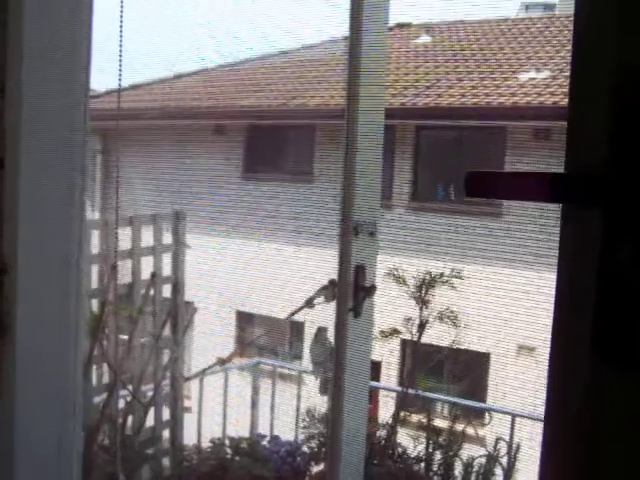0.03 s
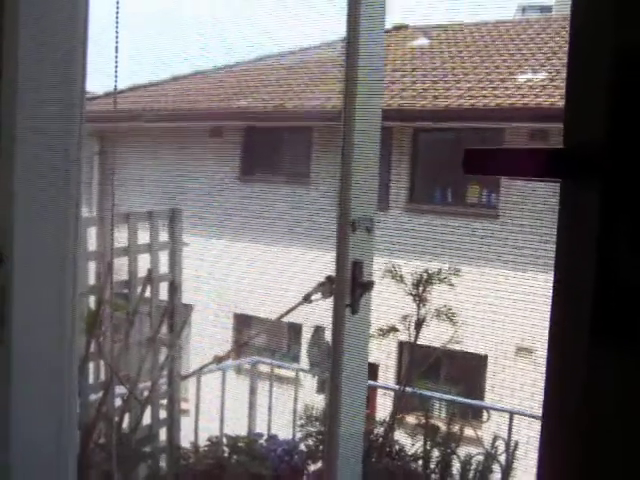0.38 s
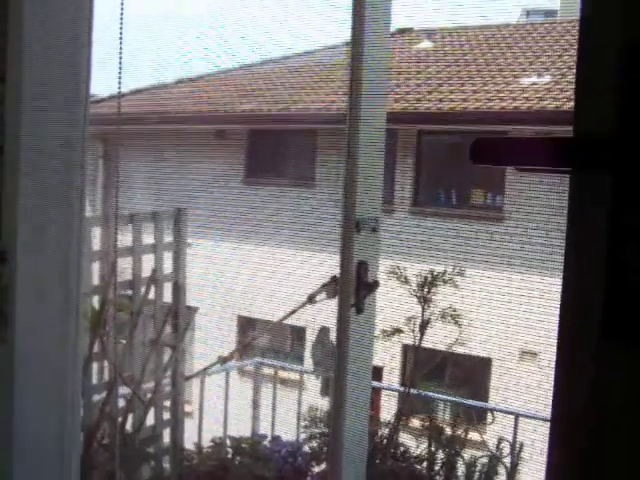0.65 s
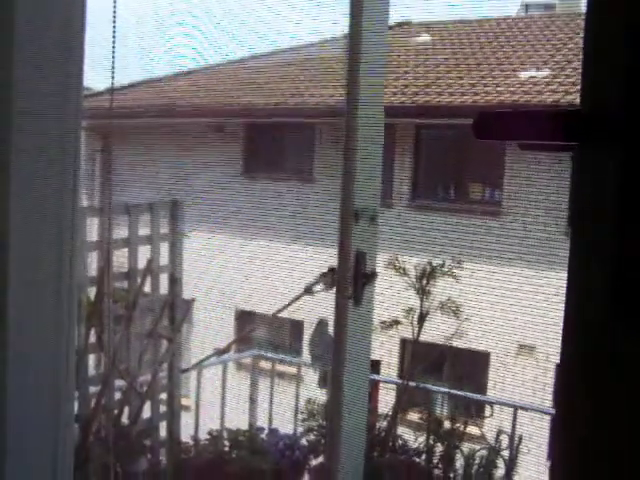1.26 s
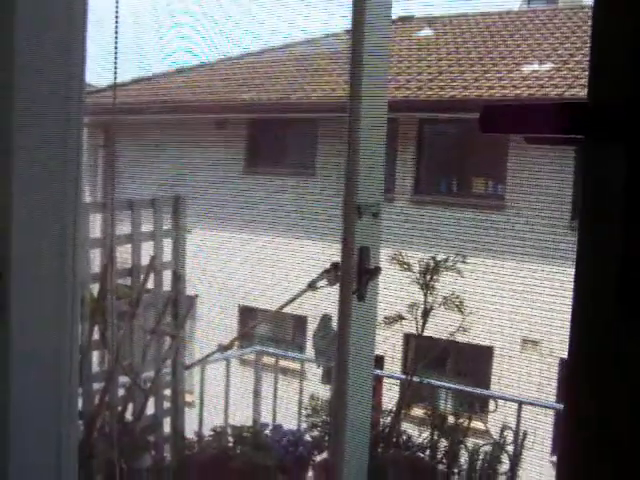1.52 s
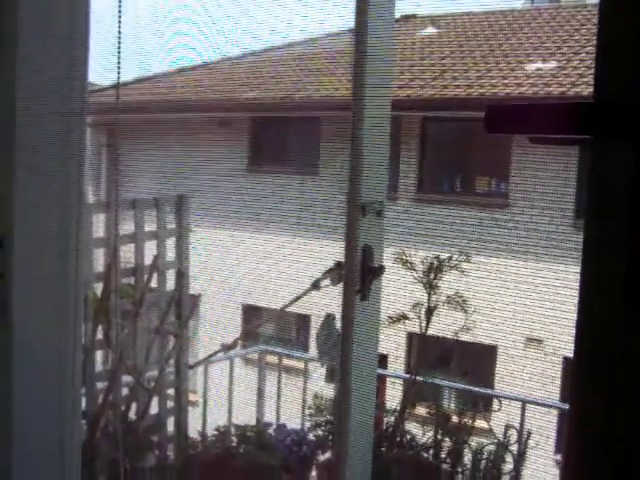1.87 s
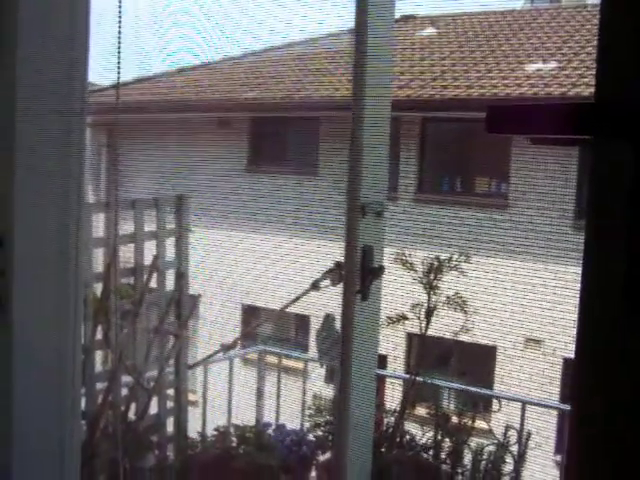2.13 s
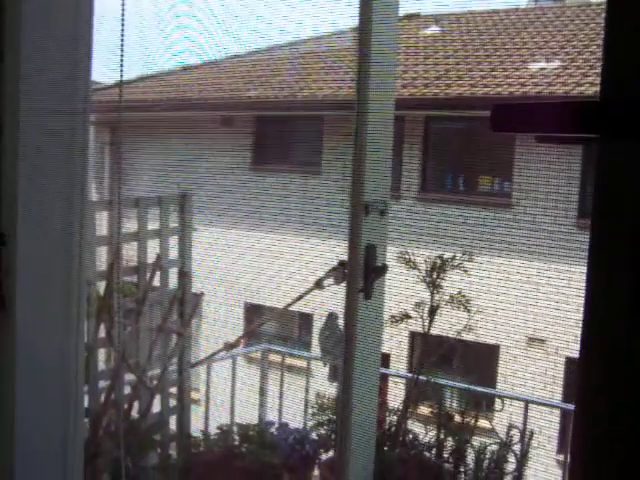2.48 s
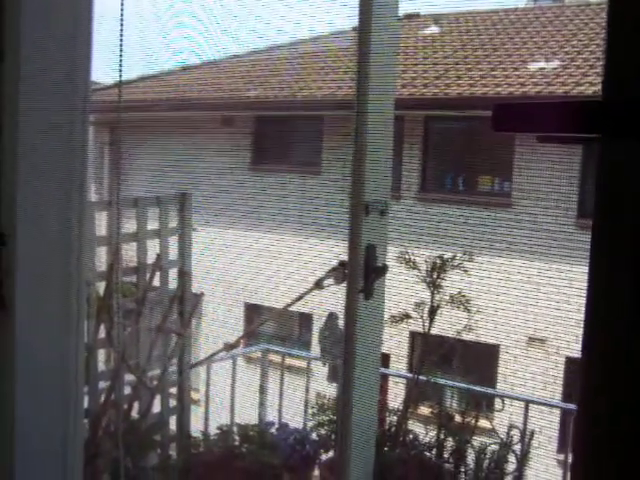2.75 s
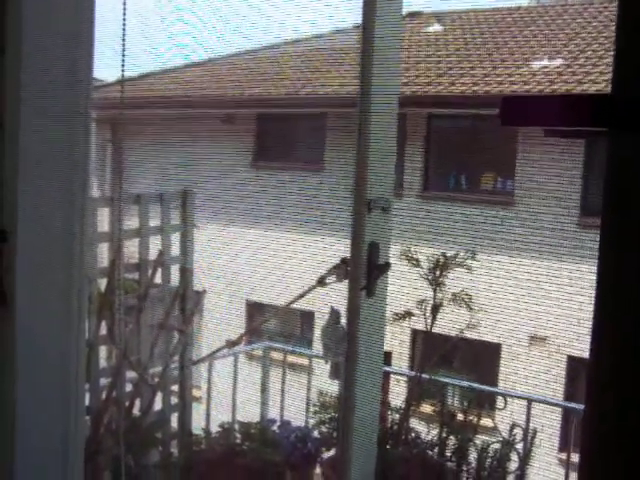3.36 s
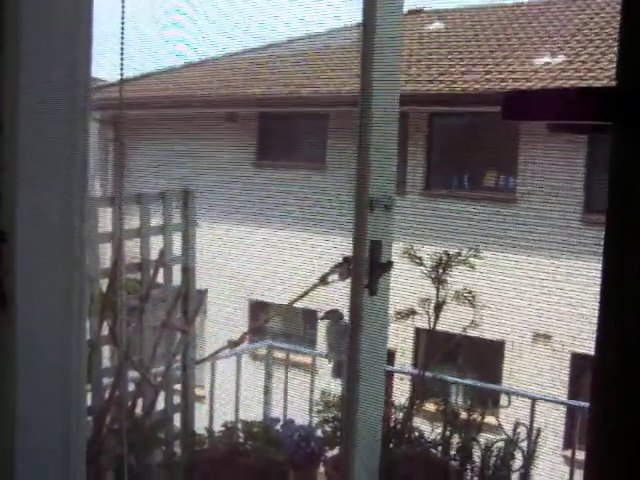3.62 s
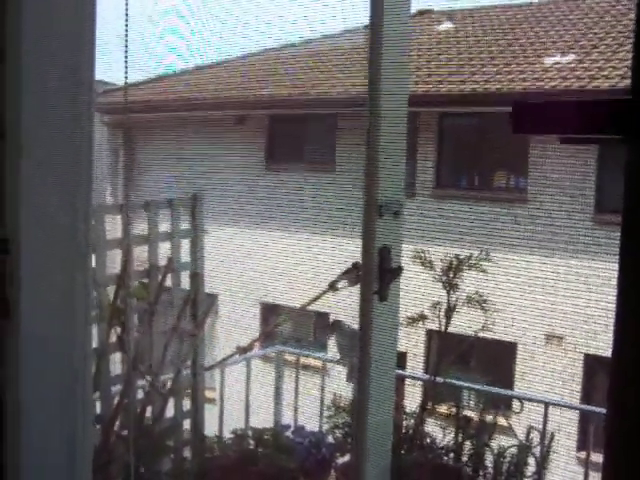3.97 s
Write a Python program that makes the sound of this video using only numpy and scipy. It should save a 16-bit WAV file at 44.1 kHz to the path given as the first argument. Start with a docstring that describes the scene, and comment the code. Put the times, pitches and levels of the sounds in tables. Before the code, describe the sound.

A bird sings short fluted whistles, hoarse croaks and quick chatter against quiet background hiss.

```python
"""Over a steady outdoor hiss, a butcherbird on a veranda rail softly sings fluted whistles, which echo
off the house walls. A run of low croaks ends in a sharp click. Two upward-sliding notes and more
whistles follow, then a light tap, and last comes scratchy chatter. Each note is a tone with harmonics
(multiples of its pitch), shaped by the throat and roughened where the syrinx (voice box) flutters."""
import sys
import numpy as np
from scipy import signal
from scipy.fft import rfft, irfft
from scipy.io import wavfile

SR = 44100
rng = np.random.default_rng(int(sys.argv[2]) if len(sys.argv) > 2 else 0)


def digitize_waveform(pressure):
    """Quantize a signal to 16-bit integers and store it at the path in sys.argv[1].

    Rows of a 2-D input are taken as channels; values are limited to [-1, 1].
    """
    field = np.atleast_2d(pressure).T
    bounded = np.clip(field, -1, 1)
    quanta = np.round(bounded * 32767).astype(np.int16)
    wavfile.write(sys.argv[1], SR, quanta)


N = 176400
T = np.arange(N) / SR


def from_db(db):
    """Turn decibels into a number to multiply by."""
    return 10 ** (np.asarray(db) / 20)


def rms_one(x):
    """Scale a signal to an average power of 1."""
    return x / np.sqrt(np.mean(x ** 2) + 1e-20)


def at_hz(points, hz):
    """Read a level from a (frequency, level) table, with octaves evenly spaced."""
    known_hz, db = np.transpose(points)
    return np.interp(np.log(np.maximum(hz, 1)), np.log(known_hz), db)


def coloured(x, spectrum):
    """Turn each frequency up or down as a table says."""
    hz = np.arange(len(x) // 2 + 1) * SR / len(x)
    return irfft(rfft(x) * from_db(at_hz(spectrum, hz)), len(x))


def flutter(hz):
    """A random wobble of typical size 1, mostly slower than the given rate."""
    smooth = signal.butter(2, min(hz, SR / 4), fs=SR, output="sos")
    return rms_one(signal.sosfilt(smooth, rng.standard_normal(N)))


def background():
    """Even outdoor hiss without its deepest bass, plus a faint, wavering low hum."""
    # Tone of the hiss: (frequency [Hz], relative level [dB])
    hiss_spectrum = [(15, -34), (25, -8), (53, -6.5), (135, -8.5), (274, -2.5), (376, -7.5), (405, -6),
                     (457, -6), (745, -5.5), (842, -7.5), (975, -2), (1130, -5.5), (1800, -10),
                     (2790, -13.5), (3920, -13.5), (7220, -34), (8570, -50), (11100, -84), (18900, -120)]
    # Tones of the hum: (frequency [Hz], level [dB])
    hum_tones = [(56, -62), (73, -63.5)]
    hiss = from_db(-41.5) * rms_one(coloured(rng.standard_normal(N), hiss_spectrum))
    hiss = signal.sosfilt(signal.butter(4, 33, "high", fs=SR, output="sos"), hiss)
    hum = sum(from_db(db) * np.sin(2 * np.pi * hz * T + flutter(3.4)) for hz, db in hum_tones)
    return hiss + np.sqrt(2) * hum


def voice_db(hz, pitch, throat):
    """The throat tilts the harmonics, boosts those near its resonance and dulls the highest."""
    # Tone shared by all notes: (frequency [Hz], level [dB])
    voice_colour = [(500, 3), (3500, 4), (4200, -4.5), (5100, 0), (5900, -9), (6700, -12.5), (7400, -17),
                    (8200, -34.5), (9000, -53)]
    centre_hz, boost_db, slope_db = throat
    width_octaves = 0.25
    resonance = np.exp(-.5 * (np.log2(hz / centre_hz) / width_octaves) ** 2)
    tilt_db = slope_db * np.log2(np.maximum(hz / pitch, 1))
    return tilt_db + boost_db * resonance + at_hz(voice_colour, hz)


def hoarse_air(air, phase, pitch, throat):
    """Breath noise, chopped by each cycle of the voice box and shaped by the throat."""
    size = len(phase)
    hz = np.maximum(np.arange(size // 2 + 1) * SR / size, 1)
    puffs = air * (1 + np.cos(phase) / 2)
    gains = from_db(voice_db(hz, pitch, throat)) / np.sqrt(1 + (pitch / hz) ** 8)  # weak below the pitch
    return rms_one(irfft(rfft(puffs) * gains, size))


def sing(notes, flutter_hz, pitch_flutter, level_flutter, hoarse):
    """A fluttering voice box: the rougher the note, the more it wobbles and the more breath it has."""
    # A note is (throat, path). Throat: (resonance [Hz], boost [dB], tilt [dB per octave]).
    # Each point on the path: (time [s], pitch [Hz], level [dB], roughness [0-1]).
    fade_s, rasp_depth, blur_per_khz = .008, .3, .17
    out = np.zeros(N)
    harmonics = np.arange(1, 14)[:, None]
    pitch_wobble, level_wobble = flutter(flutter_hz), flutter(flutter_hz)
    air = rng.standard_normal(N)
    rasp = np.array([flutter(hz=350) for _ in harmonics])
    for throat, path in notes:
        times, *columns = np.transpose(path)
        span = np.flatnonzero((T > times[0] - fade_s) & (T < times[-1] + fade_s))
        t = T[span]
        pitch, db, rough = (np.interp(t, times, column) for column in columns)
        ramp = np.clip(np.minimum(t - times[0], times[-1] - t) / fade_s + 1, 0, 1)
        fade = np.sin(np.pi / 2 * ramp) ** 2
        phase = 2 * np.pi * np.cumsum(pitch * (1 + pitch_flutter * rough * pitch_wobble[span])) / SR
        hz = harmonics * pitch
        gains = from_db(voice_db(hz, pitch, throat)) * (hz < SR / 4)
        gains = gains / np.sqrt(np.sum(gains ** 2, axis=0) / 2)
        # Even in clean notes, harmonics above the throat's resonance waver.
        above_khz = np.maximum(hz - throat[0], 0) / 1000
        waver = 1 + (rasp_depth * rough + blur_per_khz * above_khz) * rasp[:, span]
        tone = np.sum(gains * np.sin(harmonics * phase) * waver, axis=0)
        breath = hoarse_air(air[span], phase, pitch.mean(), throat)
        breath_share = np.clip(hoarse * rough ** 2, 0, .9)
        voice = np.sqrt(1 - breath_share) * tone + np.sqrt(breath_share) * breath
        out[span] += voice * (1 + level_flutter * rough * level_wobble[span]) * from_db(db) * fade
    return out


def whistles():
    """High, mostly clean notes with little breath; two of them slide up."""
    # Whistled notes: (throat, path), with columns as in sing()
    notes = [ ((3000, 8.4, 7), [(.007, 2828, -34.5, 0.22), (.024, 2984, -34, 0.18),
             (.043, 3025, -29.5, 0.19)]), ((2850, 10, -1.5), [(.212, 1436, -27.5, 0.08),
             (.22, 1450, -25, 0)]), ((3300, 16.8, -3), [(.227, 1552, -24, 0.3), (.241, 1665, -14.5, 0),
             (.26, 1690, -13.5, 0), (.268, 1655, -25, .2), (.281, 1656, -24.5, 0.06)]), ((3340, 10.8, -3.5),
             [(.436, 1435, -35.5, 0.17), (.447, 1602, -25.5, 0.25), (.466, 1567, -28.5, 0.18),
             (.477, 1559, -20, 0.01), (.498, 1474, -32, 0.01)]), ((2760, 19.3, 3.5),
             [(1.487, 2685, -33, 0.12), (1.501, 2770, -25, 0.1), (1.521, 2740, -23.5, 0.05),
             (1.532, 2725, -33, 0.1), (1.543, 2717, -25.5, 0), (1.554, 2773, -25.5, 0.14),
             (1.564, 3230, -27.5, 0.5), (1.578, 3450, -32.5, 0.36), (1.592, 3480, -39, 0.8)]),
             ((4600, 5.3, -9), [(1.501, 4850, -50, 0.26), (1.518, 6030, -38, 0.3),
             (1.527, 7020, -51.5, .2)]), ((3300, 4.2, -10.5), [(1.534, 4250, -44, 0.4),
             (1.538, 4000, -39.5, 0.4)]), ((2920, 19.7, 2.5), [(1.668, 2670, -32.5, 0.14),
             (1.686, 2733, -23.5, 0.14), (1.696, 2882, -29, 0.1), (1.721, 2730, -40.5, 0.09),
             (1.729, 2760, -22, 0.03), (1.738, 3006, -33.5, 0.24), (1.752, 3250, -28, 0.74),
             (1.768, 3430, -35.5, 0.64)]), ((4240, 5.8, -4.8), [(1.924, 1466, -37.5, 0.4),
             (1.932, 1720, -34.5, 0.2), (1.96, 1574, -33.5, 0.2), (1.985, 1555, -29, 0.1),
             (2.003, 1663, -39, 0.25), (2.028, 1592, -32.5, 0.04), (2.043, 1645, -42, 0)]), ((3400, 9, -2),
             [(2.053, 1690, -27, 0.03), (2.066, 1706, -27.5, 0.1), (2.072, 1606, -28, 0.9),
             (2.08, 1608, -34, 0.7), (2.087, 1527, -35.5, 0.3)]), ((3500, 10, -2.5),
             [(2.169, 1195, -33, 0.33), (2.184, 1540, -30.5, .3), (2.204, 1462, -34.5, 0.42)]),
             ((4600, 8.7, -6), [(2.2, 1536, -31, 0.17), (2.224, 1480, -46, 0.2), (2.245, 1544, -32.5, 0.18),
             (2.264, 1650, -33.5, 0.2)]), ((3500, 17, -4), [(2.274, 2100, -40.5, 0.17),
             (2.297, 2018, -44.5, 0.2), (2.316, 1923, -37, 0.2)]), ]
    return sing(notes, flutter_hz=227, pitch_flutter=0.068, level_flutter=0.4, hoarse=0.23)


def yard(sound):
    """House walls send back a few echoes, along with a smooth tail that dies away."""
    # Wall echoes: (delay [s], level [dB])
    walls = [(0.0151, -8.5), (0.025, -24), (0.039, -20), (0.057, -20.5), (.076, -23), (0.092, -22.5),
             (0.124, -26.5)]
    # Tone of the tail: (frequency [Hz], level [dB])
    tail_colour = [(500, 6.5), (1600, 2), (3200, 1), (5000, -1.5), (8000, -1)]
    decay_s, rise_s = 0.47, 0.011
    age = T[:SR]
    tail = rng.standard_normal(SR) * from_db(-60 * age / decay_s) * np.minimum(age / rise_s, 1)
    tail = coloured(tail / np.sqrt(np.sum(tail ** 2)), tail_colour)
    echoes = sum(from_db(db) * np.interp(T - delay, T, sound, left=0) for delay, db in walls)
    return echoes + from_db(-7.5) * signal.fftconvolve(sound, tail)[:N]


def croaks():
    """Five low notes, made hoarse by flutter and breath."""
    # Croaked notes: (throat, path), with columns as in sing()
    notes = [ ((2080, 11, -3), [(.63, 624, -37.5, 0.16), (.64, 622, -35.5, 0.17), (.668, 554, -44, 0.29)]),
             ((2130, 12, -3), [(.745, 553.3, -40, 0.77), (.757, 605, -37, 0.67), (.785, 619, -40.5, 0.35)]),
             ((2200, 8.9, -2.2), [(.846, 546.6, -41, 0.97), (.856, 526, -32, 1), (.872, 491, -43.5, 0.95)]),
             ((2030, 13.2, -2), [(.925, 558, -36.5, 0.97), (.945, 606, -31, .8), (.955, 618, -29.5, 0.1),
             (.975, 613.6, -32, 0.17)]), ((1986, 16.7, -1.5), [(1.038, 556, -27, 0.75),
             (1.047, 593.4, -28, 0.58), (1.055, 616, -27, .15), (1.067, 616, -23, .15)]), ]
    return sing(notes, flutter_hz=148, pitch_flutter=.09, level_flutter=0.34, hoarse=0.51)


def click():
    """One very short, bright click ends the last croak."""
    start_s, decay_s = 1.0712, .00015
    age = T - T[np.searchsorted(T, start_s)]
    return from_db(-22.5) * (age >= 0) * np.exp(-np.abs(age) / decay_s)


def tap():
    """A small knock rings a few short tones; the soft contact dulls them."""
    # The knock: (time [s], level [dB])
    knocks = [(2.4104, -25)]
    # Ringing tones: (frequency [Hz], relative level [dB], time to fade by 60 dB [s])
    tones = [(620, -4, 0.019), (1070, -4.5, .014), (1520, 8.5, 0.009), (2300, 3, 0.0034), (3100, 3, .01)]
    out = np.zeros(N)
    for start_s, db in knocks:
        age = np.maximum(T - start_s, 0)
        for hz, tone_db, ring_s in tones:
            level = from_db(db + tone_db - 60 * np.minimum(age / ring_s, 2))
            out += level * np.sin(2 * np.pi * hz * age) / 2
    return signal.sosfilt(signal.butter(4, 3200, fs=SR, output="sos"), out)


def chatter():
    """Quick notes that jump in pitch, made scratchy by flutter and breath."""
    # Chattered notes: (throat, path), with columns as in sing()
    notes = [ ((4060, 16.4, -1.1), [(2.669, 1930, -39.5, 0.49), (2.677, 2012, -33, 0.57),
             (2.684, 2540, -37, 0.48), (2.693, 1850, -37.5, 0.7), (2.711, 1770, -40.5, 0.62),
             (2.728, 2470, -41, 1)]), ((3940, 12.7, -7.5), [(2.738, 1293, -35.5, 0.75),
             (2.752, 1790, -34, 0.43), (2.768, 1602, -33, 0.58), (2.792, 1220, -37.5, 0.73),
             (2.812, 1342, -35, 0.74)]), ((3100, 7.9, -3.5), [(2.816, 1607, -33, 0.24),
             (2.828, 1588, -32, 0.73), (2.84, 1596, -39.5, 1)]), ((2600, 9.6, -6), [(2.849, 1400, -24, 0.2),
             (2.859, 1416, -34, .1), (2.872, 1294, -35.5, 0.31)]), ((3800, 4.2, -3),
             [(2.873, 1294, -32.5, 0.19), (2.892, 1194, -36.5, 0.39), (2.912, 1131, -33.5, 0.36)]),
             ((4000, 4, -1), [(3.007, 1373, -31, 0.29), (3.016, 1440, -26.5, 0.077),
             (3.025, 1334, -34, 0.81)]), ((4070, 18.5, 3), [(3.024, 1293, -31.5, .6),
             (3.034, 1276, -29, 0.45), (3.041, 1280, -31, 0.38), (3.049, 1234, -36.5, 0.34),
             (3.062, 1210, -36, 0.52), (3.08, 1180, -40, 0.4)]), ((3200, 9.6, -5),
             [(3.146, 2240, -41, 0.24), (3.156, 2067, -36, .3), (3.17, 1890, -37, 0.94)]),
             ((4300, 13.3, -1), [(3.175, 1238, -25.5, 0.96), (3.183, 1317, -38, 0.8),
             (3.201, 1282, -32, .8)]), ((3600, 6.4, -3.5), [(3.188, 1445, -32.5, 0.42),
             (3.203, 1557, -34.5, 0.2), (3.214, 1552, -29, 0.17), (3.231, 1503, -31, .5)]),
             ((3300, 2.8, -10), [(3.218, 2950, -31.5, 0.24), (3.223, 2630, -42.5, .2),
             (3.229, 2360, -43.5, .2)]), ((2700, 7.1, -0.5), [(3.335, 1042, -30.5, 0.26),
             (3.346, 1330, -32.5, 0.52)]), ((3600, 4.6, -1.8), [(3.427, 850, -42, 0.62),
             (3.446, 901, -41, 0.34), (3.46, 832, -38, 0.54)]), ((4300, 3, -5.5), [(3.766, 4080, -48, 0.18),
             (3.773, 4350, -40.5, .2)]), ((2300, 6.4, -5), [(3.779, 722, -35, 0.4),
             (3.786, 866, -36.5, .3)]), ((2360, 13.5, -3), [(3.789, 994, -29, 0.28),
             (3.792, 1120, -23.5, .1), (3.798, 1139, -32, 0.28), (3.826, 1099, -32.5, 0.66),
             (3.845, 1071, -35, .65), (3.866, 1062, -37, 0.59)]), ((3070, 11.2, -2),
             [(3.875, 1052, -31.5, .12), (3.883, 1082, -26, .08), (3.893, 1094, -29, .08)]),
             ((2400, 1.8, -12), [(3.953, 748, -42.5, 0.16), (3.982, 745, -41.5, 0.18),
             (3.998, 930, -41, 0.18)]), ((3500, 17, -1.1), [(3.993, 1207, -40, 0.87),
             (4.0, 1252, -27.5, 1)]), ]
    return sing(notes, flutter_hz=133, pitch_flutter=0.089, level_flutter=.35, hoarse=0.46)


def scene():
    """The bird and the tap echo over the hiss; only the click reaches the high treble."""
    near = whistles() + croaks() + tap() + chatter()
    treble_cut = signal.ellip(10, .1, 70, 8700, fs=SR, output="sos")
    outdoors = signal.sosfilt(treble_cut, near + yard(near) + background())
    return (outdoors + click())[None]


def record(dry):
    """Cut away the very highest treble."""
    return signal.sosfilt(signal.ellip(10, .1, 70, 15800, fs=SR, output="sos"), dry)


dry = scene()
out = record(dry)
digitize_waveform(out)
```